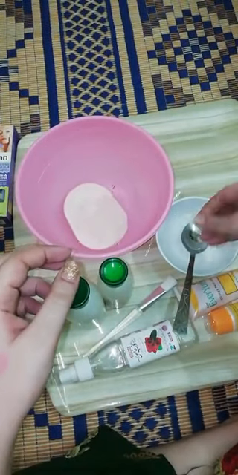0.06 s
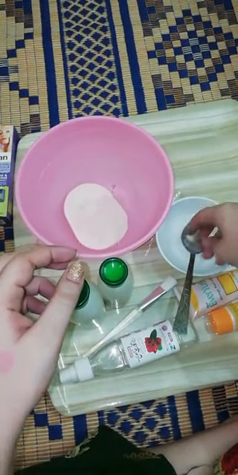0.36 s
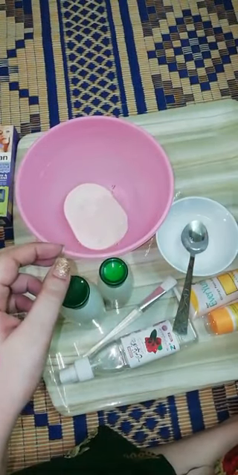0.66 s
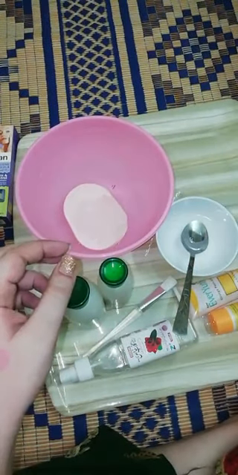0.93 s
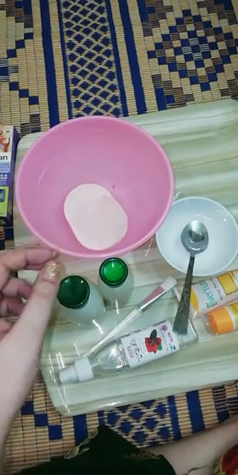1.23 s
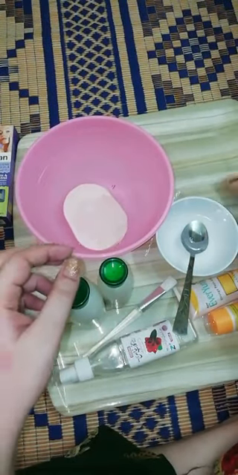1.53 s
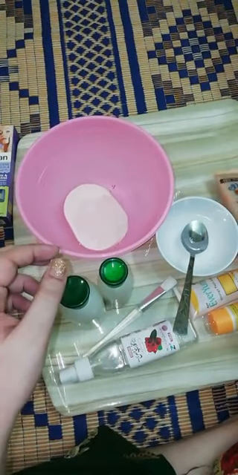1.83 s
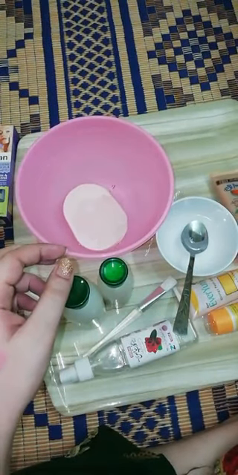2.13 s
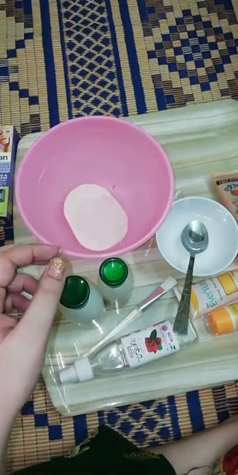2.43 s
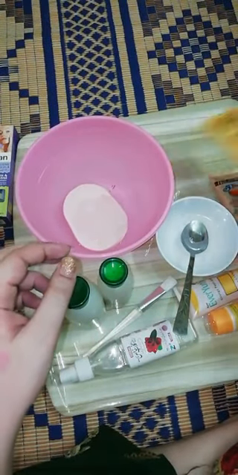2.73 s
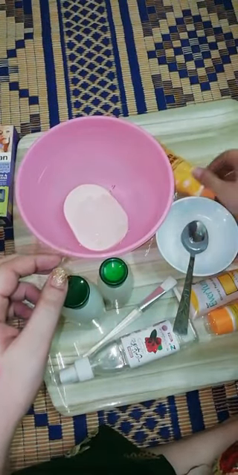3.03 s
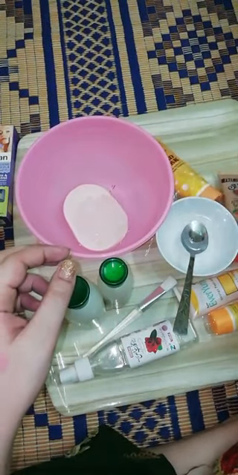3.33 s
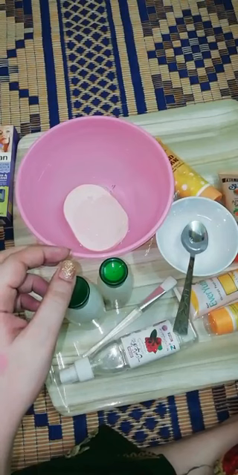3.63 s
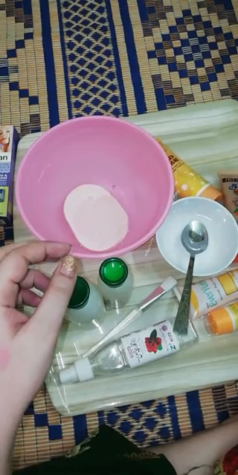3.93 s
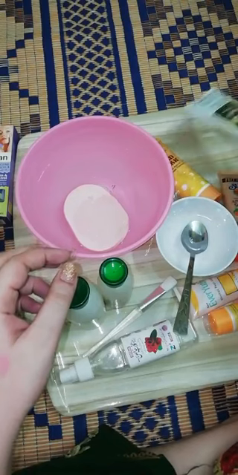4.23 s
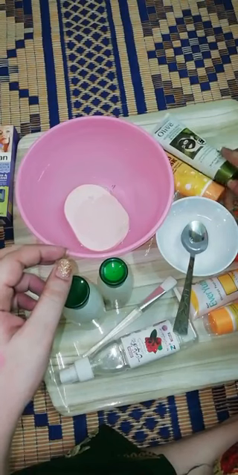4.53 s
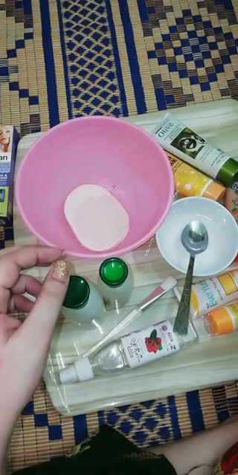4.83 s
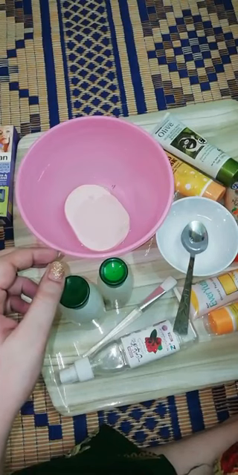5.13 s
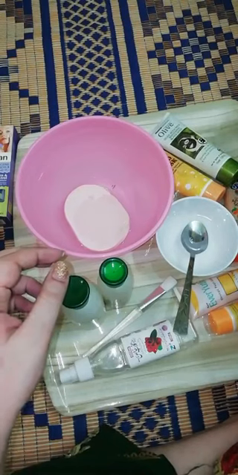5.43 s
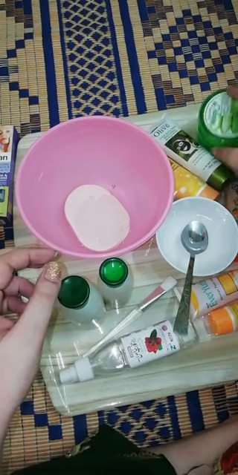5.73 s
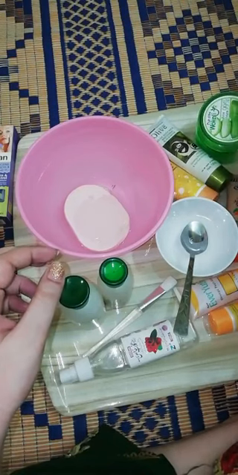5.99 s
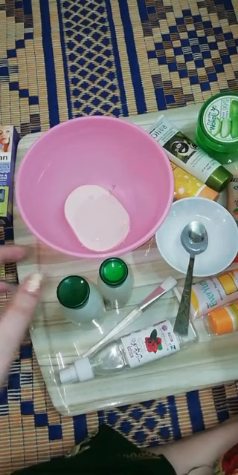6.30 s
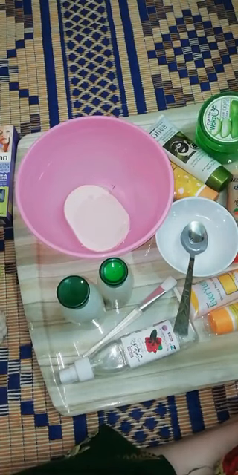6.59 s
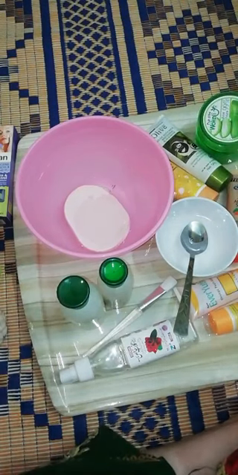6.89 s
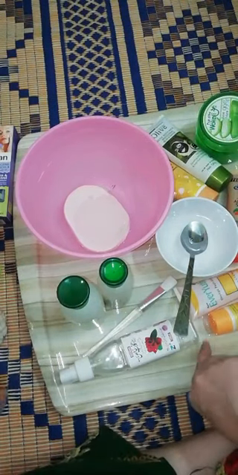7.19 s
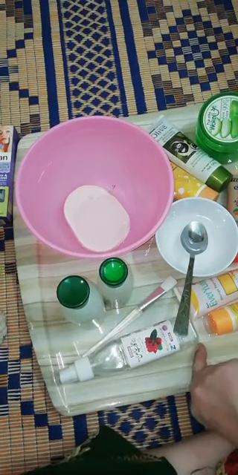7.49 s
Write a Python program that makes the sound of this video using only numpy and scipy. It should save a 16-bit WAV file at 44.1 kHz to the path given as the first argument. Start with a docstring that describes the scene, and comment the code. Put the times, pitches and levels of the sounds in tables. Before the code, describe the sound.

Plastic tubes, bottles and a jar are set down one by one on a thin tray, close to the microphone in a small room. Each lands with a light hollow thud, and the harder ones make a steel spoon chatter in a china saucer. Caps click and hands rustle softly in between. Engines hum faintly outside, where a motorbike speeds up and eases off. A longer rustle and three light knocks come last.

```python
"""A small room, one microphone close to a thin tray on a floor mat; engines hum faintly from the street.
Almost at once plastic tubes, bottles and a jar start to come down one by one. The tray thuds under each,
and the harder jolts make a steel spoon chatter in its china saucer. Hands and sleeves rustle between
the moves, and caps click. From four seconds in, a motorbike outside speeds up and rolls out;
a long rustle and three light knocks come last."""
import sys
import numpy as np
from scipy import signal
from scipy.fft import rfft, irfft
from scipy.io import wavfile
from scipy.ndimage import map_coordinates

SR = 44100
rng = np.random.default_rng(int(sys.argv[2]) if len(sys.argv) > 2 else 0)


def materialize(psi):
    """Save the field psi as 16-bit PCM at rate SR to the path in sys.argv[1].

    A 1-D psi becomes a single channel; in a 2-D psi each row is a channel.
    """
    bounded = np.clip(np.atleast_2d(psi).T, -1, 1)
    quanta = np.round(bounded * 32767).astype(np.int16)
    wavfile.write(sys.argv[1], SR, quanta)


N = 341775
TIME = np.arange(N) / SR
BLOW = np.sqrt(SR / 100)   # a blow's level is its rms over a hundredth of a second

# an engine idling out in the street: (time [s], level [dB])
ENGINE_LEVEL = [(0, -64), (1.6, -59), (2.4, -63.5), (4.3, -54), (5.6, -55.5), (7.75, -59)]
# its harmonics: (multiple of the firing rate, relative level [dB])
ENGINE_HARMONICS = [(2, -11), (3, -21), (4, -23), (5, -1), (6, -4), (7, -7.5), (8, -7.5), (11, -16),
                    (13, -12.5), (15, -31)]
# a farther motor swelling once: (time [s], level [dB])
FAR_MOTOR_LEVEL = [(0, -64), (.45, -62), (.8, -54.5), (1.3, -70), (1.8, -100)]
# a motorbike speeding up and rolling out: (time [s], pitch [Hz], level [dB])
MOTORBIKE = [(3.9, 142, -82), (4.2, 146.6, -56), (4.6, 162, -46), (4.9, 171, -61), (5.5, 167.9, -60),
             (5.85, 133.5, -55), (6.2, 127.6, -54), (6.5, 96, -51.5), (7.7, 76.35, -59)]
# distant traffic: (time [s], level [dB])
TRAFFIC_LEVEL = [(0, -58), (.8, -62.5), (2.3, -60.5), (3.7, -60), (4.1, -58), (5.2, -57), (6.2, -54.5),
                 (7.75, -57)]
# its rumble through the walls: (frequency [Hz], relative level [dB])
TRAFFIC_SPECTRUM = [(20, -14), (38, -6), (48, -6.5), (65, -0.5), (100, -12.5), (135, 3.5), (180, -7.5),
                    (260, -9), (400, -19), (800, -40)]
# room tone: (frequency [Hz], relative level [dB])
AIR_SPECTRUM = [(120, -40), (200, -5), (252, -1), (367, -9), (479, -6.5), (626, -12), (762, -18.5),
                (944, -14.5), (1420, -21), (1700, -20.5), (4620, -26), (7880, -17.5), (10500, -25),
                (14200, -32.5)]
# things landing on the tray, close by:
# (time [s], thud [dB], thud centre [Hz], hollow clack [dB], edge tick [dB], delay to tip flat or 0 [s])
LANDINGS = [(0.1867, -40.5, 451, -53.5, -51, 0.022), (0.809, -53, 375, -65, -55, 0.0063),
            (0.939, -54.5, 453, -67, -69, 0), (1.391, -34, 425, -38.5, -50, 0.015),
            (1.528, -52.5, 458, -64, -60, 0.001), (1.554, -40, 455, -48, -49, 0.0015),
            (1.588, -29, 523, -30.5, -51, 0), (1.645, -43, 430, -48, -49, 0.00065),
            (1.8646, -44.5, 535, -56.5, -50.5, 0), (1.9729, -45.5, 385, -49.5, -47, 0),
            (2.197, -46, 380, -58.5, -57, 0.011), (2.777, -54, 550, -69, -57, 0.025),
            (2.86, -44.5, 406, -59.5, -57.5, 0), (2.954, -49, 519.3, -60, -62, 0),
            (2.976, -38, 460, -40.5, -44, 0.023), (3.116, -55.5, 503, -78, -69, 0.0026),
            (3.41, -51, 423, -65, -71, 0.0021), (3.563, -53.5, 421.2, -66, -64, 0),
            (3.7026, -42.5, 336, -56, -32, 0), (3.964, -55.5, 391, -74, -61.5, 0),
            (4.199, -41.5, 410, -62.5, -58.5, 0.033), (4.3571, -35, 422, -43.5, -35.5, 0.0043),
            (4.491, -50.5, 436, -63, -68, 0.0065), (4.581, -51.5, 465, -67, -61.5, 0.00024),
            (5.452, -37, 265.7, -48, -54, .016), (5.454, -32, 529.2, -42.5, -43.5, 0.0016),
            (5.485, -39.5, 375, -41.5, -46, 0.012), (5.553, -36.5, 482.8, -50.5, -61, 0.0015),
            (5.638, -47, 551, -50.5, -56, 0.00016), (5.6701, -39, 564, -47, -47.5, 0.0076),
            (7.288, -66, 301.5, -58, -54, 0.0043), (7.594, -53, 410, -46, -45.5, 0.011),
            (7.626, -50, 450.4, -50, -67, 0.00018)]
# modes of the tray: (frequency [Hz], relative level [dB], t60 [s])
TRAY_MODES = [(181, -23, 0.034), (229, -4.5, 0.061), (317, 0.5, 0.037), (355, -2, 0.059),
              (410.4, -1, 0.091), (475, -3.5, 0.057), (552.7, -3.5, 0.064), (624, -2.5, 0.035),
              (696, -7, 0.038), (902, -10.5, 0.089)]
# a hollow plastic body: (frequency [Hz], relative level [dB])
CLACK_SPECTRUM = [(100, -51), (400, -14.5), (800, 2.5), (1050, 0.5), (1300, 3.5), (1600, -1), (1900, 1.5),
                  (2600, -1.5), (3500, -9), (6000, -20.5)]
# a hard plastic edge: (frequency [Hz], relative level [dB])
TICK_SPECTRUM = [(200, -50), (2000, -17), (3500, -8), (5800, -6.5), (7700, 1), (9000, -1), (10200, -10.5),
                 (12000, -10), (14200, -15)]
# jolts to the spoon: (time [s], level [dB], fade time [s], extra rim ping [dB], ring time [factor])
SPOON_JOLTS = [(0.1854, -26, 0.031, -6, 0.72), (1.393, -33.5, 0.038, -4, 0.36),
               (1.5705, -25, 0.031, 20, 0.39), (1.647, -34.5, 0.0042, 32, 1.4),
               (2.975, -30, 0.039, 9.5, 0.48), (5.467, -42, 0.015, -3, .35), (5.637, -29, .006, 24, 0.28)]
# steel striking china: (frequency [Hz], relative level [dB])
CHATTER_SPECTRUM = [(100, -56.5), (330, -18.5), (550, -13.5), (900, -22.5), (2000, -18), (3500, -22.5),
                    (4800, -8), (5900, -11.5), (7000, -6.5), (7700, 6.5), (8600, -2.5), (10000, -14.5),
                    (11700, -10.5), (14200, -23)]
# modes of spoon and saucer: (frequency [Hz], relative level [dB], base t60 [s])
SAUCER_MODES = [(1320, -24, .07), (2280, -24, .06), (2850, -18, .17), (3700, -23, .1), (3400, -21, .09),
                (4270, -20, .06), (4520, -18, .06), (4880, -17, .38), (5220, -16, .06), (5520, -16, .06),
                (6370, -11, .13), (6760, -14, .06), (7425, -14.5, .42), (7447, -15, .42), (7630, -4, .14),
                (7940, -3, .11), (8050, -3, .09), (8160, -5, .07), (8350, -5, .09), (8560, -7, .06),
                (8780, -9, .06), (9230, -10, .09), (9720, -17, .07), (10350, -15, .07), (11240, -10, .11),
                (11630, -9, .11), (11900, -11, .08), (12290, -11, .08), (12620, -15, .07),
                (13310, -20, .13), (14160, -15, .12)]
# a hand or sleeve sliding near the microphone: (start [s], end [s], level [dB])
HAND_SLIDES = [(0.515, 0.714, -63), (2.619, 2.867, -68), (3.323, 3.455, -59.5), (4.644, 4.882, -64.5),
               (5.9, 7.12, -59.5), (7.281, 7.31, -53.5), (7.396, 7.736, -56.5)]
# skin and cloth rubbing: (frequency [Hz], relative level [dB])
RUSTLE_SPECTRUM = [(500, -9.5), (1500, -16.5), (3500, -12), (6000, -10), (7800, -0.5), (10000, -13.5),
                   (12000, -19), (14200, -21)]
# clicks of a cap or fingernail: (time [s], level [dB])
CAP_CLICKS = [(1.8903, -49), (2.158, -53), (3.356, -48.5), (3.621, -56.5), (4.8365, -54), (5.273, -52),
              (5.527, -44), (5.592, -53.5), (5.7346, -52), (6.69, -50)]
# decay of the small room: (frequency [Hz], t60 [s])
ROOM_DECAY = [(150, 0.22), (500, 0.29), (2000, 0.29), (8000, 0.18), (14000, 0.22)]


def from_db(db):
    """Decibels to gain."""
    return 10 ** (np.asarray(db) / 20)


def unit_energy(x):
    """Scale to a sum of squares of one."""
    return x / np.sqrt(np.sum(x ** 2) + 1e-20)


def in_time(rows):
    """Each column of a curve at every sample."""
    times, *columns = np.transpose(rows)
    return [np.interp(TIME, times, column) for column in columns]


def at_hz(points, hz):
    """Read a curve on a log-frequency axis."""
    frequencies, values = np.transpose(points)
    return np.interp(np.log(np.maximum(hz, 1)), np.log(frequencies), values)


def add(track, s, sound):
    """Mix a sound into a track at a time."""
    i = int(np.clip(s * SR, 0, N - 1))
    track[i:i + len(sound)] += sound[:N - i]


def drift(rate_hz):
    """A smooth random wander with a spread of about one."""
    knots = rng.standard_normal(int(rate_hz * N / SR) + 3)
    return map_coordinates(knots, [TIME * rate_hz], order=2, mode="nearest")


def response(spectrum, size=2048):
    """Minimum-phase impulse response with this spectrum, unit energy."""
    gains = from_db(at_hz(spectrum, np.fft.rfftfreq(size, 1 / SR)))
    cepstrum = irfft(np.log(gains))
    cepstrum[1:size // 2] *= 2
    cepstrum[size // 2 + 1:] = 0
    return unit_energy(irfft(np.exp(rfft(cepstrum))))


def coloured(noise, spectrum):
    """Noise shaped by a spectrum; rms one."""
    gains = from_db(at_hz(spectrum, np.fft.rfftfreq(N, 1 / SR)))
    return unit_energy(irfft(rfft(noise) * gains, N)) * np.sqrt(N)


def hump(hz, centre_hz, octaves):
    """Weight that falls away on both sides of a pitch."""
    return 1 / (1 + (np.log2(hz / centre_hz) / octaves) ** 2)


def motor(hz, db):
    """The lowest note of a distant motor, unsteady in pitch and level."""
    phase = 2 * np.pi * np.cumsum(hz * (1 + 0.01 * drift(12))) / SR
    return np.sin(phase) * from_db(db + 1.1 * drift(7.6))


def street(firing_hz=19.5, waver_db=3.5):
    """Only the low notes of engines come through the walls, fading in and out."""
    phase = 2 * np.pi * np.cumsum(firing_hz * (1 + 0.0107 * drift(4))) / SR
    harmonics = sum(from_db(db + waver_db * drift(2.937)) * np.sin(k * phase + rng.uniform(0, 2 * np.pi))
                    for k, db in ENGINE_HARMONICS)
    idling = from_db(in_time(ENGINE_LEVEL)[0]) * harmonics
    rumble = from_db(in_time(TRAFFIC_LEVEL)[0]) * coloured(rng.standard_normal(N), TRAFFIC_SPECTRUM)
    motorbike = motor(*in_time(MOTORBIKE))
    far_motor = motor(hz=144.4, db=in_time(FAR_MOTOR_LEVEL)[0])
    return idling + rumble + motorbike + far_motor


def room_tone(level_db):
    """The steady hush of still air around the microphone."""
    return from_db(level_db) * coloured(rng.standard_normal(N), AIR_SPECTRUM)


def ring(modes, weights, scatter_db, contact_s, size=13000):
    """Decaying modes that swell while the contact lasts; every blow shares its energy anew."""
    hz, db, t60 = np.transpose(modes)
    strength = weights * from_db(db + scatter_db * rng.standard_normal(len(hz))) / np.sqrt(t60)
    strength *= rng.choice([-1, 1], len(hz))
    t = TIME[:size]
    waves = np.sin(2 * np.pi * hz * t[:, None]) * from_db(-60 * t[:, None] / t60)
    return unit_energy(waves @ strength * (1 - np.exp(-t / contact_s)))


def crack(spectrum, t60, rise_s=0.00025, size=2048):
    """A contact: a brief burst of tiny slips, coloured by the thing that is struck."""
    t = TIME[:size]
    slips = rng.standard_normal(size) * from_db(-60 * t / t60) * (1 - np.exp(-t / rise_s))
    return unit_energy(signal.fftconvolve(slips, response(spectrum)))


def tick(centre_hz, level_db, usual_db=-47, top_hz=10000):
    """The short bright snap of a hard plastic edge; the harder it is, the more top it has."""
    hz, db = np.transpose(TICK_SPECTRUM)
    focus_db = 20 * np.log10(hump(hz, centre_hz, octaves=1.2))
    top_db = 0.3 * (level_db - usual_db) / (1 + (top_hz / hz) ** 10)
    spectrum = np.column_stack([hz, db + focus_db + top_db])
    return from_db(level_db) * crack(spectrum, t60=0.011)


def landings(thud_trim_db=1.0, clack_trim_db=1.0, tick_trim_db=-1.5):
    """Each landing bends the tray, knocks on a hollow body and ticks at the edge."""
    out, mode_hz = np.zeros(N), np.array(TRAY_MODES)[:, 0]
    for s, thud_db, thud_hz, clack_db, tick_db, tip_s in LANDINGS:
        contacts = [(s - 0.004, 16.5), (s, 0)]   # a graze, then the weight comes down
        if tip_s > 0:
            contacts.append((s + tip_s, 6.5))   # softer, as the thing tips flat
        for at, loss_db in contacts:
            thud = ring(TRAY_MODES, hump(mode_hz, thud_hz, 0.42), scatter_db=4.5, contact_s=0.00052)
            add(out, at, from_db(thud_db + thud_trim_db - loss_db) * thud)
            add(out, at, from_db(clack_db + clack_trim_db - loss_db) * crack(CLACK_SPECTRUM, t60=0.036))
            add(out, at, tick(centre_hz=5700, level_db=tick_db + tick_trim_db - loss_db))
    return BLOW * out


def bounces(fade_s, hop_s=0.009, bounce_s=0.0058, fade_db=11, count=8):
    """A hop, then uneven bounces that hold up and suddenly die: (delay [s], level [dB], ring [factor])."""
    lift_off = (0.002, -5, 0.18)   # the touch that throws the spoon up is weak and damped
    delays = hop_s + bounce_s * (np.arange(count) + 0.2 * rng.standard_normal(count))
    return [lift_off] + [(delay, -fade_db * (delay / fade_s) ** 3, 1) for delay in delays]


def spoon(chatter_trim_db=0.5, ring_trim_db=1.0):
    """The spoon bounces in quick runs: each hit is a bright crack that leaves steel and china ringing."""
    out = np.zeros(N)
    on_rim = hump(np.array(SAUCER_MODES)[:, 0], centre_hz=7440, octaves=0.01)   # two close modes beat
    for s, db, fade_s, ping_db, jolt_ring in SPOON_JOLTS:
        for delay, hit_db, hit_ring in bounces(fade_s):
            t60_factor = np.clip(jolt_ring * hit_ring, 0.1, 2)   # a spoon in contact damps the ring
            modes = np.array(SAUCER_MODES) * [1, 1, t60_factor]
            chatter = crack(CHATTER_SPECTRUM, t60=0.055, rise_s=0.00046)
            china = ring(modes, 1 + from_db(ping_db) * on_rim, scatter_db=3.0, contact_s=0.00074)
            add(out, s + delay, from_db(db + hit_db + chatter_trim_db) * chatter)
            add(out, s + delay, from_db(db + hit_db + ring_trim_db) * china)
    return BLOW * out


def settling(max_db, count):
    """The loaded tray shifts on the mat with tiny taps."""
    out, edge = np.zeros(N), from_db(-3.0) * response(TICK_SPECTRUM)
    for s, size in zip(rng.uniform(0, N / SR, count), rng.random(count)):
        gain = from_db(max_db) * size
        add(out, s, gain * ring(TRAY_MODES, 1, scatter_db=2.5, contact_s=0.0022))
        add(out, s, gain * edge)
    return BLOW * out


def rustle(grain_db=1.5, flutter_db=3.5):
    """Skin and cloth slide close by in soft swells of fine, uneven grains."""
    swell = np.zeros(N)
    for start, end, db in HAND_SLIDES:
        progress = np.clip((TIME - start) / (end - start), 0, 1)
        swell += from_db(db) * np.sqrt(np.abs(np.sin(np.pi * progress)))
    grains = rng.standard_normal(N) * from_db(grain_db * drift(700) - flutter_db * drift(34))
    return swell * coloured(grains, RUSTLE_SPECTRUM)


def clicks(body_db=-21.5):
    """A cap or fingernail clicks without bending the tray: a tick with a trace of the hollow body."""
    out = np.zeros(N)
    for s, db in CAP_CLICKS:
        add(out, s, tick(centre_hz=8200, level_db=db))
        add(out, s, from_db(db + body_db) * crack(CLACK_SPECTRUM, t60=0.037))
    return BLOW * out


def room(direct, build_s=0.0024, size=22050):
    """Diffuse reflections off near walls build up quickly and die sooner in the treble."""
    t, tail = TIME[:size], np.zeros(size)
    edges_hz = [100, 400, 1500, 5000, 10000, 16000]
    for low, high in zip(edges_hz, edges_hz[1:]):
        bandpass = signal.butter(2, [low, high], "band", fs=SR, output="sos")
        t60 = at_hz(ROOM_DECAY, np.sqrt(low * high))
        tail += signal.sosfilt(bandpass, rng.standard_normal(size)) * from_db(-60 * t / t60)
    build_up = 1 - np.exp(-(t / build_s) ** 2)
    return signal.fftconvolve(direct, unit_energy(tail * build_up))[:N]


def scene():
    """At the microphone, in mono: tray and hands up close, the room around them, the street far off."""
    tray = landings() + clicks() + spoon() + settling(max_db=-70, count=22)
    background = room_tone(level_db=-65.5) + rustle() + street()
    return (tray + from_db(-8.5) * room(tray) + background)[None]


def record(dry, ceiling=0.78, cutoff_hz=14400):
    """The highest peaks are rounded and the top is cut steeply."""
    lowpass = signal.ellip(12, .3, 80, cutoff_hz, fs=SR, output="sos")
    return signal.sosfilt(lowpass, ceiling * np.tanh(dry / ceiling))


dry = scene()
out = record(dry)
materialize(out)
```